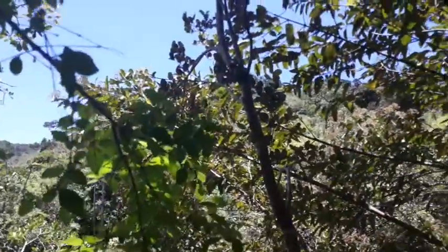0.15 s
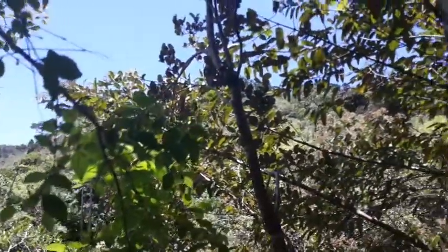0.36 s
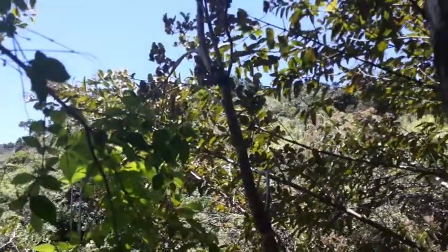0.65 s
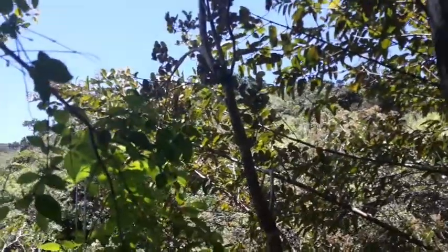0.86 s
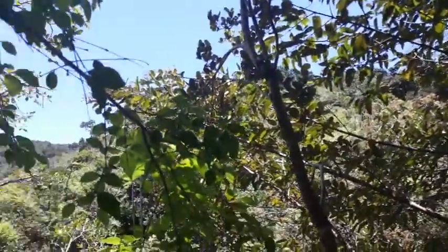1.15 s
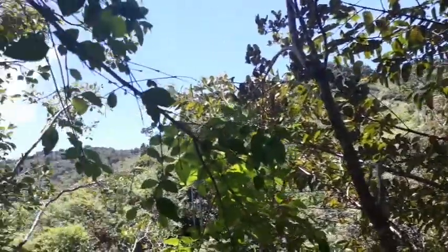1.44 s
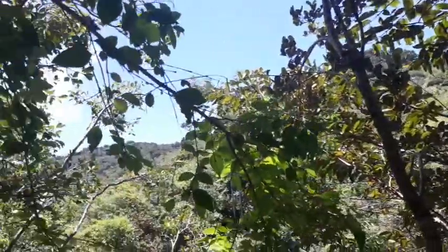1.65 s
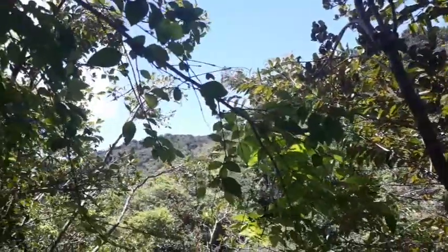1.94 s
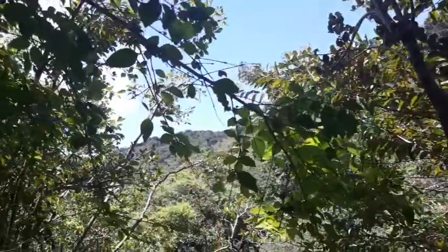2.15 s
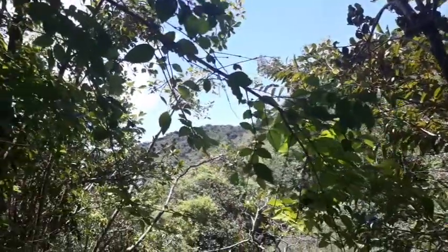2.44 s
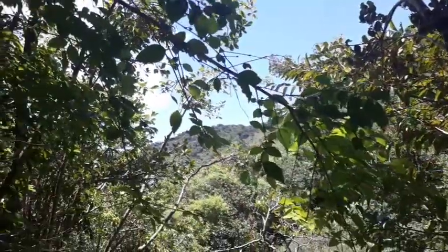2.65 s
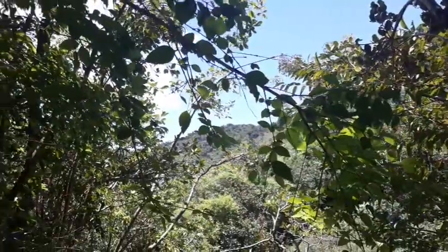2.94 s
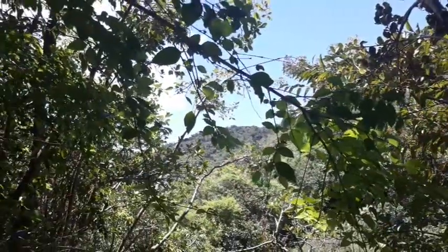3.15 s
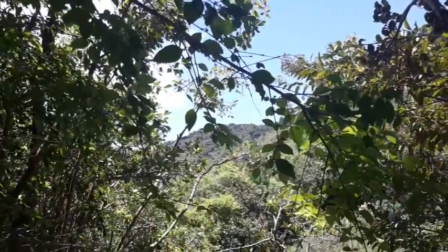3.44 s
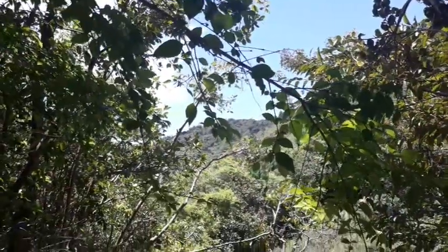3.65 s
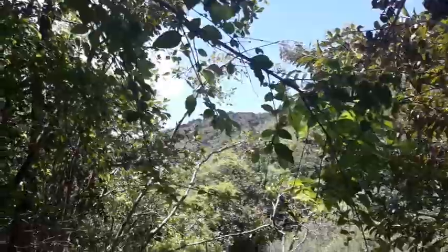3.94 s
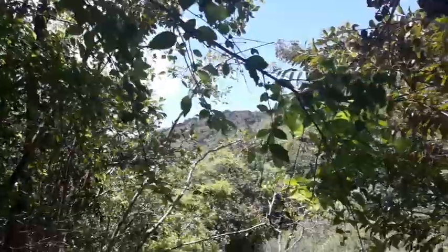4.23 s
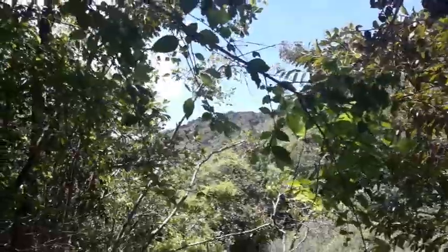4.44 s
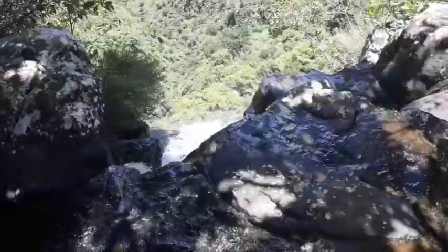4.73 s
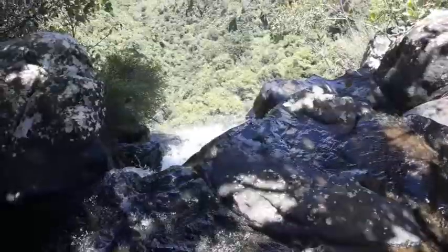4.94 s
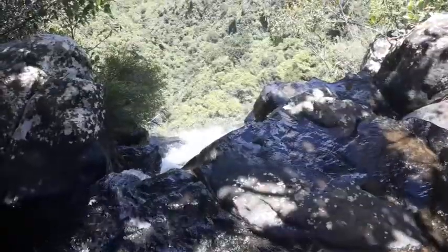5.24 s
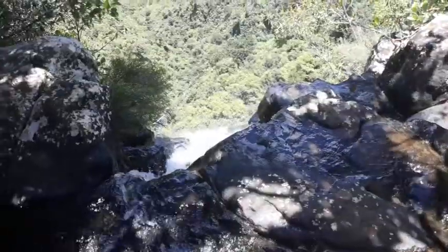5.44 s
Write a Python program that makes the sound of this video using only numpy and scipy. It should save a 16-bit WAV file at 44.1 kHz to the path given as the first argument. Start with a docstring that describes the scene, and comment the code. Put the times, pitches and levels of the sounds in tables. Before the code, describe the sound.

A steady forest stream rushes at a distance with small bubbling plips, then cuts abruptly to a louder, windy waterfall roar.

```python
"""Forest stream some way off, a short silent break, then the lip of a waterfall.
The stream is coloured noise plus swarms of damped sines (churn below, hiss above), with single
bubbles and spray ticks. The waterfall is a louder, brighter roar of the same kind, with lumpy wind
rumble, pressure thumps at the single microphone port and a faint hollow tone."""
import sys
import numpy as np
from scipy import signal
from scipy.fft import rfft, irfft, next_fast_len
from scipy.io import wavfile
from scipy.ndimage import uniform_filter1d, map_coordinates

SR = 44100
rng = np.random.default_rng(int(sys.argv[2]) if len(sys.argv) > 2 else 0)


def to_linear_factor(level_db):
    """Convert decibel levels (scalar or array-like) to linear amplitude factors."""
    exponent = np.asarray(level_db, float) / 20
    return 10 ** exponent


def dump_mix(stems):
    """Bounce the given channels to the path in sys.argv[1] as a 16-bit WAV at rate SR."""
    frames = np.atleast_2d(stems).T  # one column per channel
    limited = np.clip(frames, -1, 1)  # hard clip at full scale
    pcm = np.round(limited * 32767).astype(np.int16)
    wavfile.write(sys.argv[1], SR, pcm)


N = 246518

# Silence between the two places. One row: start in seconds, end in seconds.
BREAK_S = (4.5160, 4.5545)
# Stream levels. Each row: time in seconds, churn in dB, hiss in dB, spray lift in dB.
STREAM_LEVELS = [(0, -37, -46, -2), (1.3, -37, -46, -2), (2.4, -37.5, -46, -.4), (3.5, -36.5, -45.5, 0.8),
                 (4.51, -36.5, -46, 1.3)]
# Waterfall levels. Each row: time in seconds, churn in dB, hiss in dB, spray lift in dB.
FALL_LEVELS = [(4.57, -27.5, -32.5, 0), (5.06, -24.5, -29.5, 0.2), (5.59, -24.5, -29, -1.2)]
# Colour of the stream below the split. Each row: frequency in Hz, relative density in dB per Hz.
STREAM_CHURN_COLOUR = [(25, -32), (48, -26), (135, -9), (250, -5.5), (358, -11), (489, -5), (757, -4.5),
                       (971, -1), (1220, -4), (1900, -5), (2250, -10.5), (2860, -20), (3600, -15),
                       (4680, -45)]
# Colour of the stream above the split. Each row: frequency in Hz, relative density in dB per Hz.
STREAM_HISS_COLOUR = [(1290, -30), (2200, -3), (2840, -9.5), (3630, -5), (4280, -5), (5810, -10),
                      (7130, -16.5), (8760, -12), (9990, -18.5), (15100, -19), (15700, -18.5)]
# Colour of the fall below the split. Each row: frequency in Hz, relative density in dB per Hz.
FALL_CHURN_COLOUR = [(250, -18), (430, -5), (547, -5), (597, -3.5), (983, -3), (1820, -1.5), (3600, -8),
                     (4680, -38), (7920, -120)]
# Colour of the fall above the split. Each row: frequency in Hz, relative density in dB per Hz.
FALL_HISS_COLOUR = [(1290, -31), (2200, -1), (2390, -2), (6300, -16), (7870, -17.5), (8760, -14),
                    (10200, -22), (15200, -20.5), (15700, -19.5)]
# Bubbles that stand out. Each row: start in seconds, level before the envelope in dB, first pitch in Hz.
BUBBLES = [(.291, -24, 991), (.385, -24, 1040), (.413, -35, 248), (.791, -23, 1700), (1.265, -34, 180),
           (1.635, -25, 950), (1.925, -27, 930), (2.103, -25, 988), (2.5845, -35, 6210),
           (2.6718, -34, 6110), (3.402, -26, 1050), (3.782, -25, 1800), (3.909, -35, 288), (3.98, -26, 953),
           (4.288, -23, 1240)]
# Spray drops close by. Each row: start in seconds, noise level before attack and filter in dB.
TICKS = [(1.1757, -35.5), (1.4905, -39), (1.5618, -38), (1.8562, -41), (3.8287, -38)]
# Wind rumble. Each row: time in seconds, rms level in dB.
WIND_LEVELS = [(4.56, -35.5), (4.7, -32.5), (4.95, -34), (5.27, -32.5), (5.35, -27.5), (5.41, -30.5),
               (5.48, -25.5), (5.59, -25.5)]
# Colour of the wind rumble. Each row: frequency in Hz, relative density in dB per Hz.
RUMBLE_COLOUR = [(15, -42), (30, -24), (65, -7), (113, -2), (200, -1), (320, 1), (430, -5), (560, -40)]
# Eddies at the port. Each row: time in seconds, push before filtering in dB, suction as share of push.
EDDIES = [(4.5558, -13, 0), (4.5676, -14, 0), (4.6625, -16, .3), (4.7087, -10, 0), (4.7228, -13, 0),
          (4.8829, -8, 0), (4.9047, -8, 0), (4.9155, -13, 0), (4.9219, -13, 0), (5.0537, -10, 0),
          (5.2333, -5, .8), (5.3052, -14, 0), (5.3415, -13, 0), (5.3448, -18, 2.5), (5.3551, -12, 0),
          (5.448, -11, .9), (5.4761, -4, 1.45), (5.5084, -10, 0), (5.5005, -3, 0), (5.5119, -3, 0),
          (5.5401, -5, .55), (5.5608, -3, 0), (5.5742, -7, 0)]

SPLIT_HZ = 2850  # churn below, hiss above
STRAY_DB, STRAY_SPREAD_DB = -31, 2  # lesser bubbles at random
STRAY_HZ, STRAY_SPREAD_OCTAVES = 1000, .7
STRAY_DB_PER_OCTAVE = 5.5  # weaker below the middle pitch
PUSH_MS, SUCTION_MS, SUCTION_LAG_MS = .9, 1.15, 2.7  # bell widths (one sigma) and delay
PUSH_SPREAD = .15  # log spread of push width
SMALL_EDDY_DB, SMALL_SPREAD_DB = 12, 2.5  # push over the rumble, before filtering
HOOT_S, HOOT_HZ, HOOT_DB = 5.46, 558, -26
HOOT_ATTACK_S, HOOT_HOLD_S = .012, .051
HOOT_FADE_DB_PER_S, HOOT_SAG_HZ_PER_S = 160, 650


def unit(x):
    """Scales to rms 1."""
    return x / np.sqrt(np.mean(x ** 2) + 1e-20)


def curves(rows):
    """Interpolates each column after the time to one value per sample."""
    s, *columns = np.transpose(rows)
    return [np.interp(np.arange(N) / SR, s, column) for column in columns]


def wobble(knots_per_s):
    """Smooth random curve through normal random knots."""
    knots = rng.standard_normal(int(N * knots_per_s / SR) + 4)
    return map_coordinates(knots, [np.arange(N) * knots_per_s / SR])


def filtered(x, response):
    """Multiplies the spectrum of x by a response given as a function of Hz."""
    size = next_fast_len(N + SR // 2)
    return irfft(rfft(x, size) * response(np.fft.rfftfreq(size, 1 / SR)), size)[:N]


def coloured(x, colour):
    """Shapes x by a colour table, interpolated over log frequency; rms 1."""
    table_hz, table_db = np.transpose(colour)
    log_hz = np.log(table_hz + 1)
    return unit(filtered(x, lambda hz: to_linear_factor(np.interp(np.log(hz + 1), log_hz, table_db))))


def patchy(patch_db):
    """White noise with random louder and softer patches in time and frequency; rms 1."""
    z = signal.stft(rng.standard_normal(N), nperseg=512)[2]
    field = uniform_filter1d(rng.standard_normal(z.shape), 5, 0)
    field = uniform_filter1d(field, 8, 1)
    noise = signal.istft(z * to_linear_factor(patch_db * unit(field)), nperseg=512)[1]
    return unit(noise[:N])


def bubbles(s, db, hz, cycles, size):
    """Damped sines that start softly and rise in pitch, decaying over a number of cycles."""
    turns = hz[:, None] * np.arange(size) / SR
    envelope = (1 - np.exp(-turns / 0.51)) * np.exp(-turns / cycles)
    tone = np.sin(2 * np.pi * turns * (1 + .012 * turns))
    sound = to_linear_factor(db)[:, None] * envelope * tone
    at = np.round(s * SR).astype(int)[:, None] + np.arange(size)
    return np.bincount(at.ravel(), sound.ravel(), N + size + SR)[:N]


def swarm(count, lo_hz, hi_hz, cycles, spread_db, size):
    """Random bubbles spread evenly in time and Hz, with an exponential tail of louder ones; rms 1."""
    when, pitch, loudness = rng.random((count, 3)).T
    hz = lo_hz + (hi_hz - lo_hz) * pitch
    db = -spread_db * np.log(1.001 - loudness) + 10 * np.log10(hz)
    return unit(bubbles(when * N / SR, db, hz, cycles, size))


def water(churn_colour, hiss_colour, churn_db, hiss_db, spray_db, bubbly_db, fizzy_db, surge_db):
    """Far wash plus separate bubbles below the split, plus fizz above; surges lift both."""
    surge = surge_db * (wobble(3.9) + wobble(9))
    churn = patchy(0.8) + to_linear_factor(bubbly_db) * swarm(
        count=10000, lo_hz=149.7, hi_hz=3410, cycles=3.36, spread_db=1.0, size=500)
    hiss = patchy(0.74) + to_linear_factor(fizzy_db) * swarm(
        count=30000, lo_hz=2400, hi_hz=16000, cycles=1.0, spread_db=2.5, size=40)

    def split_angle(hz):
        """Crossover angle, 0 below to a quarter turn above."""
        return np.pi / 4 * (1 + np.clip((hz - SPLIT_HZ) / 500, -1, 1))

    churn = unit(filtered(coloured(churn, churn_colour), lambda hz: np.cos(split_angle(hz))))
    hiss = unit(filtered(coloured(hiss, hiss_colour), lambda hz: np.sin(split_angle(hz))))
    spray = filtered(hiss, lambda hz: hz ** 2 / (hz ** 2 + 8000 ** 2))
    hiss = hiss + (to_linear_factor(spray_db) - 1) * spray
    spatter_db = .45 * np.clip(wobble(70), 0, 2.2) ** 2  # brief bursts across the hiss
    return to_linear_factor(churn_db + surge) * churn + to_linear_factor(hiss_db + 0.54 * surge + spatter_db) * hiss


def stream():
    """Steady rush with single bubbles and spray ticks standing out."""
    rush = water(STREAM_CHURN_COLOUR, STREAM_HISS_COLOUR, *curves(STREAM_LEVELS),
                 bubbly_db=-7.5, fizzy_db=-5, surge_db=.35)
    rows = np.vstack([BUBBLES, stray_bubbles()])
    return rush + bubbles(*rows.T, cycles=5.5, size=8000) + ticks()


def stray_bubbles():
    """Rows for lesser bubbles at random times, levels and pitches."""
    when = rng.random(24) * BREAK_S[0]
    loudness, pitch = rng.standard_normal((2, 24))
    octaves = STRAY_SPREAD_OCTAVES * pitch
    db = STRAY_DB + STRAY_SPREAD_DB * loudness + STRAY_DB_PER_OCTAVE * np.minimum(octaves, 0)
    return np.transpose([when, db, STRAY_HZ * 2 ** octaves])


def ticks():
    """Each drop is a few milliseconds of decaying treble noise."""
    out, t = np.zeros(N), np.arange(400) / SR
    for s, db in TICKS:
        envelope = to_linear_factor(db - 60 * t / 0.013) * (1 - np.exp(-t / .0005))
        out[round(s * SR):][:len(t)] += envelope * rng.standard_normal(len(t))
    return filtered(out, lambda hz: np.clip((hz - 7000) / 1500, 0, 1))


def waterfall():
    """Close roar with wind rumble, thumps and a faint hollow tone."""
    roar = water(FALL_CHURN_COLOUR, FALL_HISS_COLOUR, *curves(FALL_LEVELS),
                 bubbly_db=-6, fizzy_db=-6, surge_db=.35)
    wind_db, = curves(WIND_LEVELS)
    return roar + wind_rumble(wind_db) + eddies(wind_db) + hoot()


def wind_rumble(wind_db):
    """Wind off the fall: low coloured noise whose level wobbles at random."""
    noise = coloured(rng.standard_normal(N), RUMBLE_COLOUR)
    return to_linear_factor(wind_db) * unit(to_linear_factor(2.4 * wobble(25)) * noise)


def small_eddies(wind_db):
    """Rows for 16 random eddies that follow the rumble level."""
    when, suction = rng.random((2, 16))
    when = BREAK_S[1] + when * ((N - 1) / SR - BREAK_S[1])
    over_db = rng.normal(SMALL_EDDY_DB, SMALL_SPREAD_DB, len(when))
    return np.transpose([when, wind_db[(when * SR).astype(int)] + over_db, suction])


def eddies(wind_db):
    """Bells of pressure, some with suction after; the microphone low-cut makes them swing back."""
    t, pressure = np.arange(N) / SR, np.zeros(N)
    rows = np.vstack([EDDIES, small_eddies(wind_db)])
    widths_ms = PUSH_MS * np.exp(rng.normal(0, PUSH_SPREAD, len(rows)))
    for (s, db, share), width_ms in zip(rows, widths_ms):
        near = slice(round(s * SR) - 500, round(s * SR) + 500)
        ms = (t[near] - s) * 1000
        push = np.exp(-.5 * (ms / width_ms) ** 2)
        suction = np.exp(-.5 * ((ms - SUCTION_LAG_MS) / SUCTION_MS) ** 2)
        pressure[near] += to_linear_factor(db) * (push - share * suction)
    cut_hz, damping, halo_hz = 55, .75, 42

    def response(hz):
        """Low-cut times halo, a slight opposite pressure before and after the core."""
        low_cut = -hz ** 2 / (cut_hz ** 2 - hz ** 2 + 2j * damping * cut_hz * hz)
        halo = hz ** 2 / (hz ** 2 + halo_hz ** 2)
        return low_cut * halo

    return filtered(pressure, response)


def hoot():
    """A faint hollow tone swells, holds, then fades while its pitch sags."""
    t = np.maximum(np.arange(N) / SR - HOOT_S, 0)
    late = np.maximum(t - HOOT_HOLD_S, 0)
    level_db = HOOT_DB - HOOT_FADE_DB_PER_S * late + 1.5 * wobble(40)
    turns = np.cumsum(HOOT_HZ - HOOT_SAG_HZ_PER_S * late) / SR
    return (1 - np.exp(-t / HOOT_ATTACK_S)) * to_linear_factor(level_db) * np.sin(2 * np.pi * turns)


def scene():
    """Two places one after the other, the same signal in both channels."""
    t = np.arange(N) / SR
    mono = stream() * (t < BREAK_S[0]) + waterfall() * (t > BREAK_S[1])
    return np.array([mono, mono])


def low_pass(x):
    """Removes everything above the highest recorded frequency."""
    return signal.sosfilt(signal.butter(12, 15910, fs=SR, output="sos"), x)


def record(dry):
    """Finished mix, as stored."""
    return low_pass(dry)


dry = scene()
out = record(dry)
dump_mix(out)
```